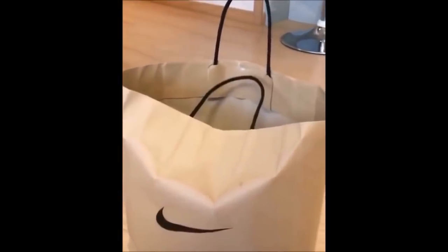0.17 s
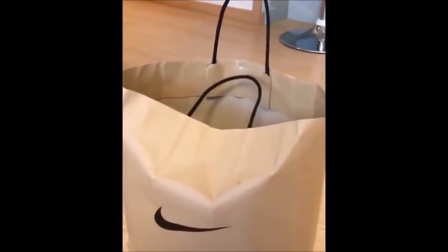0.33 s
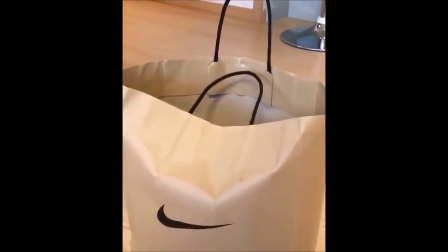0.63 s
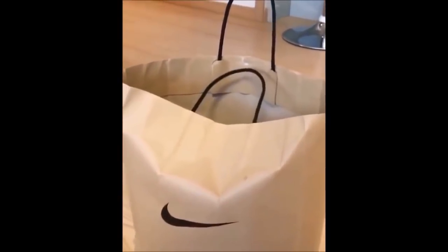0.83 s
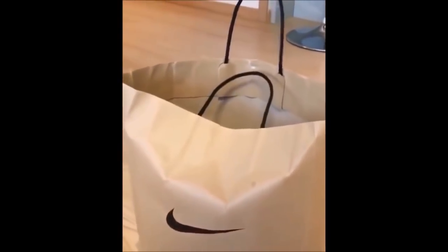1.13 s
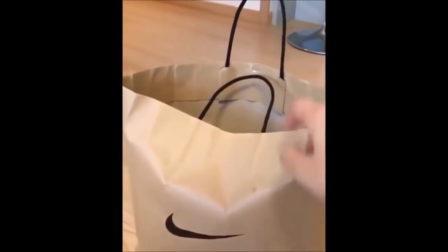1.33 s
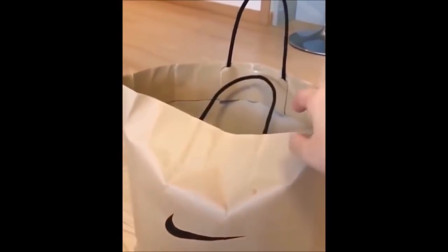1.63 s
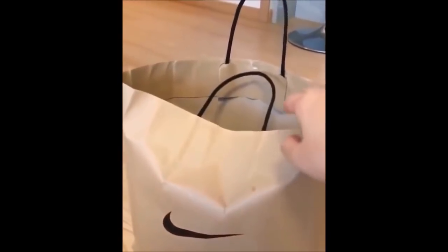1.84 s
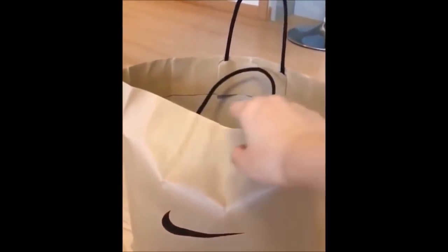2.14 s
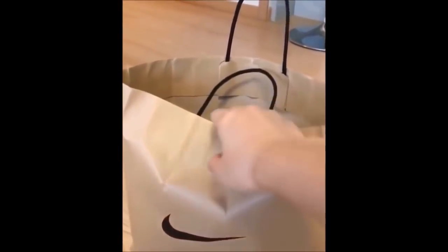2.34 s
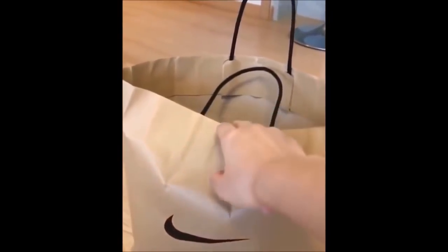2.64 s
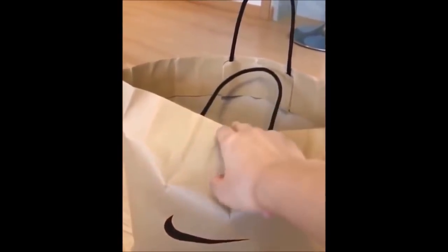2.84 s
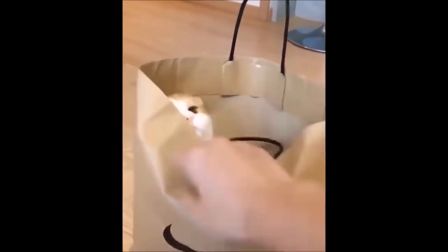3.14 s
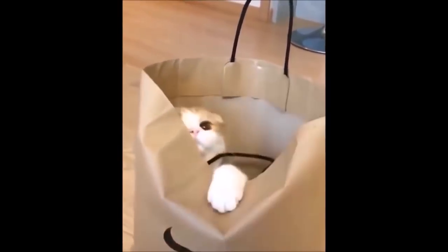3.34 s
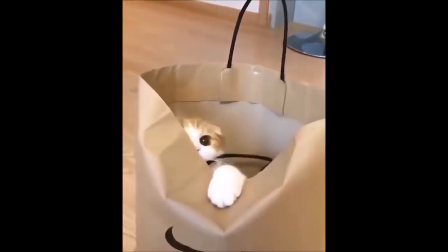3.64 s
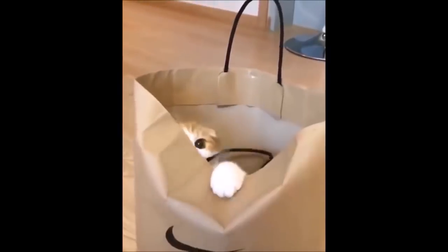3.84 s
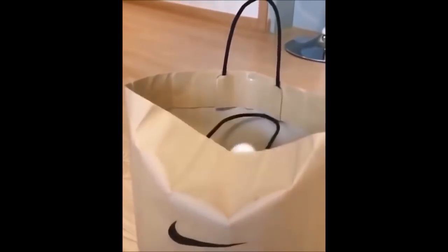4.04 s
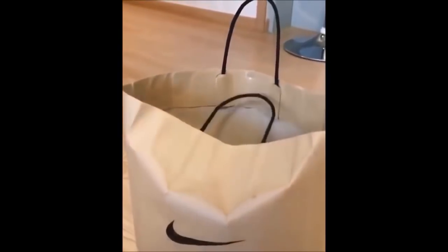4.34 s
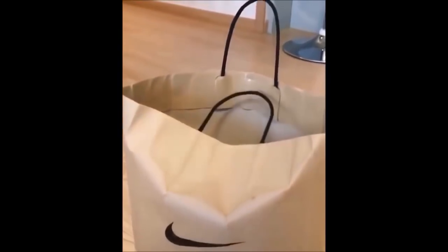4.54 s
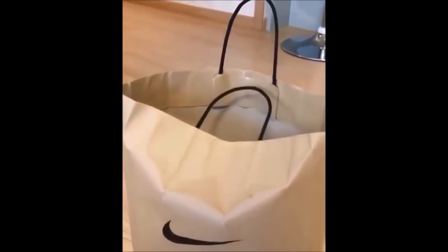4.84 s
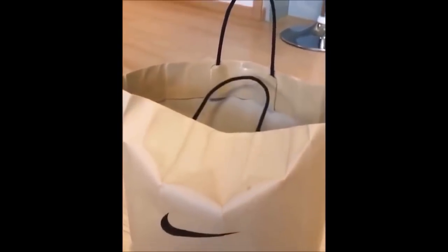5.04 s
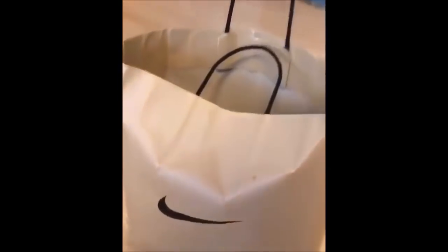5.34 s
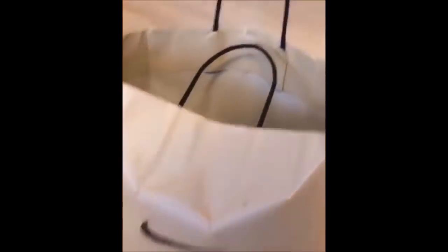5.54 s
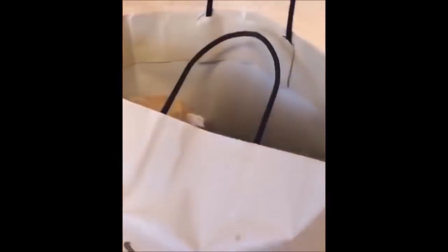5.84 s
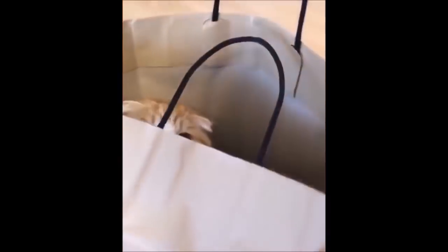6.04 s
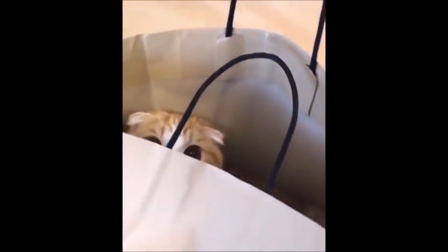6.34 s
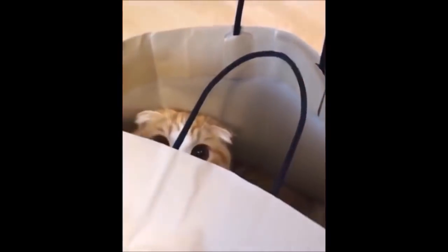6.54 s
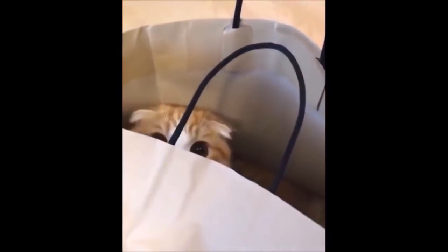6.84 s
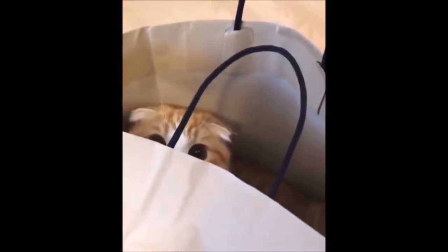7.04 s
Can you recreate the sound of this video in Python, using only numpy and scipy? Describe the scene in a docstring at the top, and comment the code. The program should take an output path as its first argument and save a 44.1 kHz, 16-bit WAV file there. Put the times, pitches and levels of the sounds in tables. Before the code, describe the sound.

Far-off reverberant dish clatter, then a close burst of dry paper taps and crinkles, fading to faint stirs over low room rumble.

```python
"""A house with a wooden floor: a kitten shifts in a paper bag close by, in soft rustles and a few dry taps.
Far off in a hard-walled kitchen, pot, lid, cups, bowl, spoon and cupboard wood are knocked, mostly echo.
Knocks are contact noise plus decaying modes through feedback delays; rustles are clumped clicks in noise;
taps are short sines with rattle, crack and thump. Low rumble and faint hiss, as noise bands, lie under all."""
import sys
import numpy as np
from scipy import signal
from scipy.fft import rfft, irfft, next_fast_len
from scipy.io import wavfile
from scipy.ndimage import uniform_filter1d

SR = 44100
rng = np.random.default_rng(int(sys.argv[2]) if len(sys.argv) > 2 else 0)


def wav_out(sig):
    """Save sig, one row per channel (or a flat mono array), as 16-bit PCM at SR to the path in sys.argv[1]."""
    wavfile.write(sys.argv[1], SR, np.round(np.clip(np.atleast_2d(sig).T, -1, 1) * 32767).astype(np.int16))


def volts_from_db(level):
    """Convert decibel levels to linear amplitude ratios."""
    exponent = np.asarray(level, float) / 20
    return 10 ** exponent


N = 317652


def rms_one(x):
    """Scales to unit rms."""
    return x / np.sqrt(np.mean(x ** 2) + 1e-20)


def at_hz(points, hz):
    """Reads a (hz, value) curve along log frequency."""
    p = np.array(points)
    return np.interp(np.log(np.maximum(hz, 1)), np.log(p[:, 0]), p[:, 1])


def band(x, low_hz, high_hz):
    """Butterworth band-pass."""
    edges_hz = [low_hz, min(high_hz, .45 * SR)]
    return signal.sosfilt(signal.butter(2, edges_hz, "band", fs=SR, output="sos"), x)


def drift(rate_hz):
    """Slow random wander of rms 1: noise through two equal poles at a 40th of the sample rate."""
    pole = np.exp(-80 * np.pi * rate_hz / SR)
    noise = rng.standard_normal(N // 40 + 2002)
    slow = signal.lfilter([1], [1, -2 * pole, pole * pole], noise)[2000:]
    return np.interp(np.arange(N) / 40, np.arange(len(slow)), rms_one(slow))


def add(out, start_s, x):
    """Mixes x into out from start_s."""
    i = round(start_s * SR)
    out[i:i + len(x)] += x[:N - i]


# spectrum of the room tone, relative: hz, band_level_db
ROOM_TONE = [(20, -35), (30, -15), (45, -1.5), (75, -2.5), (95, -11.5), (124, -4), (170, -12.5), (250, -17),
             (450, -25.5), (800, -29), (1400, -37.5), (3000, -40), (7000, -45), (14000, -51)]


def room_tone(rms_db, lumpy_db):
    """Half-octave bands of noise; the rumble comes in lumps, the hiss is steady."""
    out, edges_hz = 0, 18 * 2 ** np.arange(0, 10.1, .5)
    white = rng.standard_normal((2, N))
    for k, (low_hz, high_hz) in enumerate(zip(edges_hz, edges_hz[1:])):
        mid_hz = np.sqrt(low_hz * high_hz)
        sway_db = lumpy_db * drift(4.5) if mid_hz < 300 else 0
        gain = volts_from_db(at_hz(ROOM_TONE, mid_hz) + sway_db)
        out = out + gain * band(white[k % 2], low_hz, high_hz)  # neighbours use separate noise
    return volts_from_db(rms_db) * rms_one(out)


def ring(modes, t, spread_db):
    """Decaying sines of set energy, each struck a little harder or softer by chance."""
    hz, level_db, t60_s = np.transpose(modes)[:, :, None]
    phase = rng.random(hz.shape)  # in cycles: the modes do not set off in step
    strength = volts_from_db(level_db + rng.normal(0, spread_db, hz.shape)) / np.sqrt(t60_s * SR)
    return np.sum(strength * volts_from_db(-60 * t / t60_s) * np.sin(2 * np.pi * (hz * t + phase)), axis=0)


def knock_colour(low_db, mid_db, high_db, heft_db, contact_s):
    """Knock spectrum (hz, db): heft lifts the bass and dulls the top, a long contact dulls it too."""
    low_db, mid_db = low_db + heft_db, mid_db + 0.98 * heft_db
    softness_db = np.log2(contact_s / .015)  # 1 dB per doubling of contact
    high_db = high_db - 0.18 * heft_db - softness_db
    return [(90, low_db - 8.5), (250, low_db), (700, mid_db), (1600, 0.27),
            (3500, -1.2 - 0.17 * heft_db), (7000, high_db), (14000, high_db - 10.5)]


# modes of the worktop under every knocked thing: hz
COUNTER_HZ = [83, 234, 335, 409]
# the same modes: level_db, t60_s
COUNTER = [(-5, 0.42), (2, 0.19), (-1, 0.3), (2.5, 0.083)]


def knocks(rows, modes, low_db, mid_db, high_db):
    """Contact scuff and the thing's own ring, coloured alike, over the worktop's boom.

    low_db, mid_db, high_db: colour at 250, 700 and 7000 Hz at no heft and 15 ms contact."""
    out, size, lead_s = np.zeros(N), 16384, .01
    t = np.maximum(np.arange(size) / SR - lead_s, 0)
    hz = np.arange(size // 2 + 1) * SR / size
    pink = np.sqrt(2000 / np.maximum(hz, 20))
    for start_s, level_db, heft_db, ring_db, contact_s in rows:
        contact_s = np.clip(contact_s, .002, .08)
        colour = knock_colour(low_db, mid_db, high_db, heft_db, contact_s)
        u = t / contact_s
        swell = 1 - np.exp(-4 * u)  # modes build up while the contact lasts
        scuff = rfft(rng.standard_normal(size) * u * np.exp(-2 * u))
        scuff = scuff / np.sqrt(uniform_filter1d(abs(scuff) ** 2, size=60))  # favours no pitch
        rings = swell * ring(modes, t, spread_db=2.3)
        struck = pink * scuff + rfft(volts_from_db(ring_db) * rings)
        coloured = irfft(struck * volts_from_db(at_hz(colour, hz)), size)
        boom = swell * ring(np.c_[COUNTER_HZ, COUNTER], t, spread_db=1.0)
        boom = volts_from_db(low_db + heft_db + 3) * boom
        add(out, start_s - lead_s, volts_from_db(level_db) * (coloured + boom))
    return out


# lid strikes, level before the echo: start_s, level_2khz_db, heft_db, ring_db, contact_s (capped at 0.08)
LID_KNOCKS = [(.038, -35, 2, 4, 0.026), (.1, -30.5, 4, 7, 0.022), (.1238, -27, -15, -8, 0.007),
              (.1488, -29, 5, 3, 0.02), (.1887, -33, 0.5, -12, 0.075), (.851, -26.5, -7, 8.5, 0.0057),
              (.9044, -22.5, -3.5, -2, 0.011), (.908, -15.5, -5, 6.5, 0.0041), (.9594, -23, -4, 10, 0.12),
              (2.4644, -31, 1, 2, 0.022), (2.4938, -27, 2.5, 3.5, 0.034), (2.5497, -30.5, 2, 2.5, 0.027),
              (2.5842, -36.5, -16, -3, 0.036)]
# lid modes: hz
LID_HZ = [721, 1130, 1335, 1512, 1950, 2149, 2302, 2514, 2790, 3110, 3390, 3590, 3880, 4265, 5001, 5188,
          5380, 6450, 7672, 8120, 8936, 9720, 11198, 13262]
# the same modes: level_db, t60_s
LID = [(-7.5, 0.047), (-19, .06), (-6, 0.11), (-1, 0.14), (-8, 0.24), (-2, 0.13), (-10.5, 0.3),
       (-3.5, 0.066), (-11, 0.078), (-10, 0.15), (-14.5, 0.061), (-12.5, .06), (-22, 0.11), (-10, 0.037),
       (2, 0.14), (-4.5, 0.059), (-9, 0.07), (-16, .08), (-9.5, .1), (-16, 0.13), (-8.5, .12), (-18, .08),
       (-13.5, 0.29), (-12.5, .15)]


def lid():
    """Pot lid: many close modes, the slowest taking 0.3 s to die."""
    return knocks(LID_KNOCKS, np.c_[LID_HZ, LID], low_db=-7, mid_db=-4.5, high_db=-11.5)


# decay of the kitchen echo: hz, t60_s
KITCHEN = [(100, 0.59), (300, 0.76), (1000, 0.7), (2500, 0.66), (5000, 0.49), (10000, 0.4), (15000, 0.12)]


def kitchen(x, direct_db):
    """First arrival and sixteen feedback delays with the table's decay, smeared by allpasses.

    direct_db is against the raw delays, before both are scaled down together."""
    size = next_fast_len(N + SR)
    hz = np.arange(size // 2 + 1) * SR / size
    turn, t60_s = -2j * np.pi * hz, at_hz(KITCHEN, hz)
    lags_s, echo = np.geomspace(.0231, .0617, 16), 0
    for k, lag_s in enumerate(lags_s):
        first = np.exp(turn * lag_s * (k * .618 % 1))  # staggered first returns
        loop = volts_from_db(-60 * lag_s / t60_s) * np.exp(turn * lag_s)
        echo = echo + (-1) ** k * first / (1 - loop)
    delays = np.exp(turn * np.array([[.0007], [.0017], [.0029], [.0043]]))
    smear = [(z - .6) / (1 - .6 * z) for z in delays]
    # round a corner even the first arrival is blurred
    heard = smear[0] * smear[1] * smear[2] * (volts_from_db(direct_db) + echo * smear[3])
    return irfft(rfft(x, size) * heard, size)[:N] / np.sqrt(np.sum(1 / (lags_s * SR)))


# pot strikes, level before the echo: start_s, level_2khz_db, heft_db, ring_db, contact_s
POT_KNOCKS = [(.7675, -21.5, -3, 15.5, 0.011), (.781, -23, -1.5, 16.5, 0.0047),
              (1.0747, -30.5, -1, 6.5, 0.027)]
# pot modes: hz
POT_HZ = [500, 732, 1100, 1351, 1394, 1500, 1946, 2140, 2302, 3020, 3268, 3570, 4682, 6720, 8932, 9530]
# the same modes: level_db, t60_s
POT = [(-9, 0.05), (-18, 0.059), (-18.5, 0.06), (-0.5, 0.12), (-9, 0.086), (-6, 0.086), (-14.5, 0.19),
       (-18, 0.059), (-14, .12), (-11.5, .05), (-16, .1), (-19, 0.11), (-10, .1), (-15.5, 0.11),
       (-15.5, 0.11), (-17, 0.12)]


def pot():
    """Pot: three strikes with strong ring, fullest near 700 Hz."""
    return knocks(POT_KNOCKS, np.c_[POT_HZ, POT], low_db=-7.5, mid_db=5.1, high_db=-17)


# cupboard strikes, level before the echo: start_s, level_2khz_db, heft_db, ring_db, contact_s
WOOD_KNOCKS = [(1.741, -43.5, -4.5, -2, 0.022), (1.7714, -56.5, 3.5, 2.5, 0.0097),
               (2.2794, -34.5, -4.5, -9, 0.02), (4.9917, -38, -4.5, 5, 0.007),
               (5.0488, -48, 4.5, -1.5, 0.0048), (5.194, -43.5, -4.5, 2.5, 0.0032),
               (5.209, -46, 11, -1, 0.0083), (5.2497, -63, 8, 5, 0.011)]
# cupboard wood modes: hz, level_db, t60_s
WOOD = [(320.5, 13, 0.065), (758, 5, 0.022), (1403, 4, 0.031), (2000, -8, 0.02), (3030, -7, 0.02),
        (3820, -16, 0.037), (5150, -7, 0.021)]


def wood():
    """Cupboard wood: few modes, all heavily damped."""
    return knocks(WOOD_KNOCKS, WOOD, low_db=-5.5, mid_db=5.3, high_db=-11)


# bowl strikes, level before the echo: start_s, level_2khz_db, heft_db, ring_db, contact_s
BOWL_KNOCKS = [(1.8682, -55, -8, 7.9, 0.011), (2.826, -35.5, -2, 7, 0.0074),
               (2.8694, -43.5, -1, 6.5, 0.0041)]
# bowl modes: hz
BOWL_HZ = [400, 800, 2035, 3009, 3650, 4043, 4872, 6029]
# the same modes: level_db, t60_s
BOWL = [(8, 0.035), (5, 0.011), (3.5, 0.028), (-4, 0.022), (-7, 0.051), (-9, 0.09), (-13, 0.061),
        (-1, 0.027)]


def bowl():
    """Bowl: short modes from 400 Hz up, strongest at the bottom."""
    return knocks(BOWL_KNOCKS, np.c_[BOWL_HZ, BOWL], low_db=-8, mid_db=-0.45, high_db=-11)


# cup strikes, level before the echo: start_s, level_2khz_db, heft_db, ring_db, contact_s
CUP_KNOCKS = [(1.92, -40, -26, 6.6, 0.015), (1.9574, -41.5, -11, 1.7, 0.015),
              (2.1925, -36.5, -13.5, 8.2, 0.0086), (2.2965, -27, -6, 4.3, 0.0024),
              (2.3504, -47, 17.5, 6.4, 0.013), (2.5091, -35, 12.5, 1.5, 0.021),
              (2.6598, -42.5, 4, 8.6, 0.0081), (6.991, -36.5, -14.5, 11, 0.0105),
              (7.002, -40.5, 4, 1.7, 0.0075), (7.0292, -53.5, 17, 0.5, 0.0059),
              (7.1448, -35, -1, 13.7, 0.014), (7.1759, -31, 0.5, 5.8, 0.014)]
# cup modes: hz, level_db, t60_s
CUP = [(1540, -40, .08), (1908, -10, 0.19), (2337, -6, 0.095), (2467, 1, 0.017), (2857, -4.5, .07),
       (3145, 8.5, 0.016), (3310, -1, 0.036), (3772, -3, 0.032), (4055, -10, 0.069), (4540, -10, 0.055),
       (5120, -9, 0.023), (5650, -13.5, 0.052), (5877, -5.5, 0.045), (6530, -5, 0.017), (7130, -19, .04),
       (8230, -16, 0.072), (9460, -12.5, 0.18), (9750, -7.5, 0.084), (10360, -17.5, 0.27), (11890, -42, .1)]


def cups():
    """Cups: stiff walls, so high modes, little bass and a bright colour."""
    return knocks(CUP_KNOCKS, CUP, low_db=-15, mid_db=-8, high_db=-2.77)


# spoon strikes, level before the echo: start_s, level_2khz_db, heft_db, ring_db, contact_s
SPOON_KNOCKS = [(2.6343, -45, 0.5, 2.1, 0.0184), (2.6688, -54, 0.45, 2.9, 0.031)]
# spoon modes: hz, level_db, t60_s
SPOON = [(3410, 15, 0.049), (6720, 4.5, 0.03), (7800, -2, 0.042), (11200, -5, .12)]


def spoon():
    """Spoon: four sparse high modes."""
    return knocks(SPOON_KNOCKS, SPOON, low_db=0, mid_db=14.3, high_db=13.8)


# paw and paper taps: start_s, snap_peak_db, snap_hz, thump_db (re snap), t60_s
TAPS = [(3.246, -52, 2000, -6, 0.013), (3.259, -49, 1200, -11, .012), (3.293, -53.5, 1980, 0.5, 0.051),
        (3.35, -36.5, 1180, -30, 0.017), (3.401, -34, 1360, 7, 0.021), (3.424, -38.5, 860, 3.5, 0.023),
        (3.469, -48.5, 680, 14.5, 0.015), (3.533, -38, 907, -20, 0.06), (3.55, -52, 1570, 14, 0.014),
        (3.63, -44, 404, -5.5, 0.049), (3.697, -52, 900, -2, 0.022), (4.269, -50.5, 1940, -15, 0.011),
        (4.346, -51, 3500, -3, 0.046), (4.383, -50.5, 465, 11, 0.043), (4.576, -63, 1000, 15.5, 0.025),
        (6.405, -52, 908, 0.5, 0.021), (6.433, -44.5, 602, 0.5, 0.014), (6.506, -62, 1500, -10.5, 0.011),
        (6.55, -53, 1280, -8, 0.011)]


def taps(crack_db, rattle_db):
    """The paper panel snaps at two pitches and rattles on, with a bright crack and a low thump on the boards."""
    light_thump_hz, octave_down_db = 268, -37.5  # a tap this strong thumps an octave lower
    out, t = np.zeros(N), np.arange(SR // 5) / SR
    for start_s, level_db, snap_hz, thump_db, t60_s in TAPS:
        noise = rng.standard_normal((2, len(t)))
        fade = volts_from_db(-60 * t / np.clip(t60_s, .004, .15))
        snap = np.sin(2 * np.pi * snap_hz * t) + 0.15 * np.sin(2 * np.pi * 3.4 * snap_hz * t)
        snap = snap * fade
        rattle = rms_one(band(noise[0], snap_hz / 2.5, snap_hz * 1.6))
        rattle = volts_from_db(rattle_db) * rattle * fade ** .45
        crack = volts_from_db(crack_db) * noise[1] * fade ** 1.5
        thump_hz = light_thump_hz / (1 + volts_from_db(1.7 * (level_db - octave_down_db)))
        thump = volts_from_db(thump_db) * np.sin(2 * np.pi * thump_hz * t) * fade ** 0.58
        add(out, start_s - .001, volts_from_db(level_db) * (snap + rattle + crack + thump))
    return out


# paper stirs: peak_s, hollow_db, crisp_db (re hollow), rise_20db_s (at least 0.002), fall_20db_s (at least 0.005)
STIRS = [(3.262, -57, -5.5, .012, 0.28), (3.354, -50, -17.5, -0.12, 0.1451), (3.4, -34.5, -22, .008, 0.06),
         (3.452, -57, -9, 0.07, 0.05), (3.531, -54, -16, -0.26, 0.23), (3.85, -74, -12, -0.1, 0.6),
         (4.05, -79, -1.5, 1.4, -0.4), (4.276, -68.5, 7, 0.3, 0.21), (4.344, -61, 0.5, -0.06, 0.09),
         (4.412, -71, -7, -0.57, 1.2), (4.57, -59, -5.5, -0.01, -0.11), (4.836, -76, -5, -0.4, -0.3),
         (5.792, -85.5, 14, -0.76, .25), (6.034, -74, 8, -0.54, -0.23), (6.156, -69, -3, 0.25, -0.07),
         (6.362, -76.5, -1, .3, -0.6), (6.428, -64.5, -8.5, 0.06, 0), (6.73, -75.5, -10.5, 0.3, -0.5)]


def rustle(clicks_per_s, spread_db, smooth_db):
    """Creases give in clumps of tiny clicks over soft rubbing noise; crisp and hollow parts follow each stir."""
    t, hollow, crisp = np.arange(N) / SR, np.zeros(N), np.zeros(N)
    for peak_s, hollow_db, crisp_db, rise_s, fall_s in STIRS:
        before, after = (peak_s - t) / max(rise_s, .002), (t - peak_s) / max(fall_s, .005)
        stir = volts_from_db(hollow_db - 20 * np.maximum(before, after))
        hollow = hollow + stir
        crisp = crisp + volts_from_db(crisp_db) * stir
    out = np.zeros(N)
    for level, low_hz, high_hz in [(crisp, 2490, 11000), (hollow, 200, 1500)]:
        born = rng.random(N) < clicks_per_s * volts_from_db(5 * drift(25)) / SR  # the rate wanders: clumps
        strength = volts_from_db(spread_db * np.minimum(rng.exponential(1, N), 4))
        clicks = born * strength * rng.choice([-1, 1], N)
        grains = rms_one(band(clicks, low_hz, high_hz))
        rubbing = rms_one(band(rng.standard_normal(N), low_hz, high_hz))
        out += level * rms_one(grains + volts_from_db(smooth_db) * rubbing)
    return out


def scene():
    """Kitchen knocks and a little of the bag go through the echo; bag and room tone come straight."""
    far = lid() + pot() + wood() + bowl() + cups() + spoon()
    bag = taps(crack_db=-24, rattle_db=-8)
    bag = bag + rustle(clicks_per_s=900, spread_db=4.0, smooth_db=-3)
    air = volts_from_db(-6) * kitchen(far + volts_from_db(-41.5) * bag, direct_db=11.5)
    return (air + bag + room_tone(rms_db=-57, lumpy_db=0.63))[None]


def low_pass(x):
    """Removes everything above the highest recorded frequency."""
    return signal.sosfilt(signal.butter(12, 15100, fs=SR, output="sos"), x)


def record(dry):
    """A small microphone drops the deepest bass; a steep low-pass cuts the top."""
    bassless = signal.sosfilt(signal.butter(2, 32, "high", fs=SR, output="sos"), dry)
    mix = signal.sosfilt(signal.cheby2(12, 70, 15700, fs=SR, output="sos"), bassless)
    return low_pass(mix)


dry = scene()
out = record(dry)
wav_out(out)
```